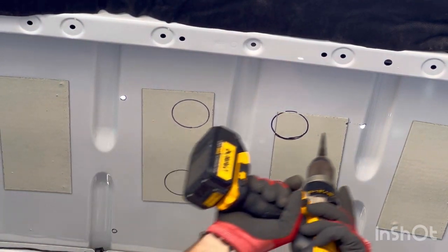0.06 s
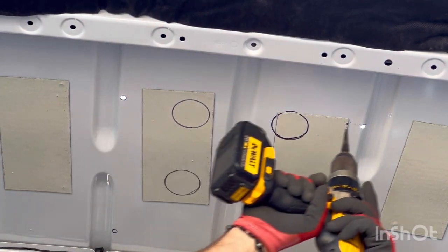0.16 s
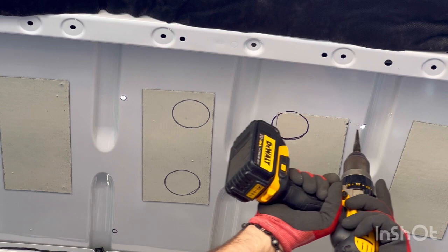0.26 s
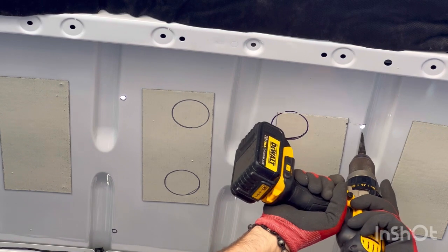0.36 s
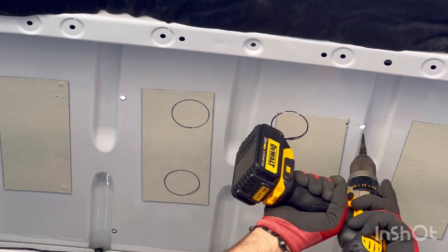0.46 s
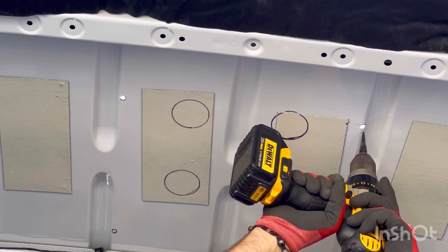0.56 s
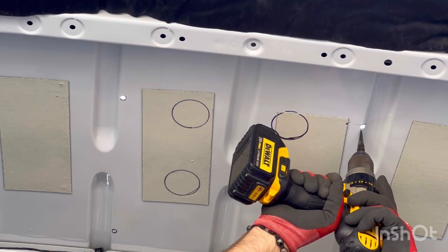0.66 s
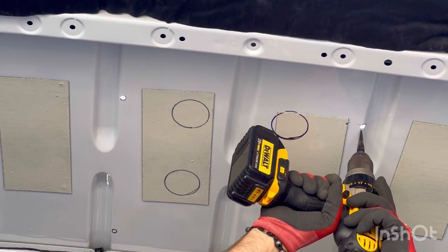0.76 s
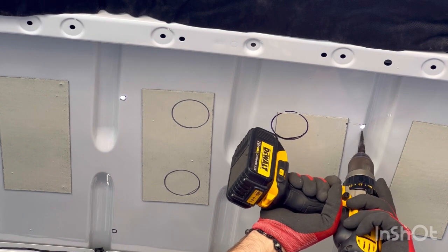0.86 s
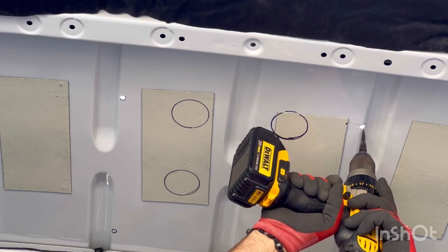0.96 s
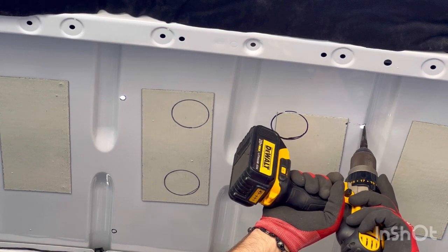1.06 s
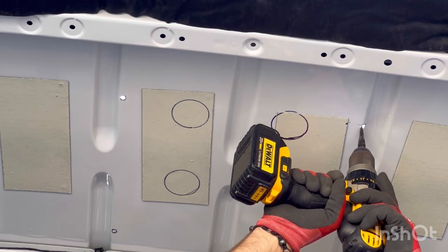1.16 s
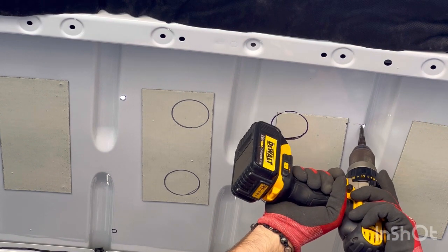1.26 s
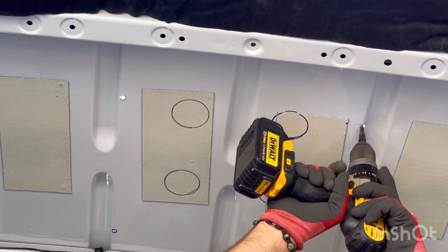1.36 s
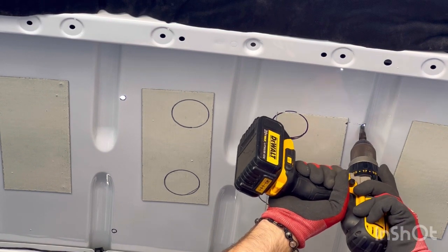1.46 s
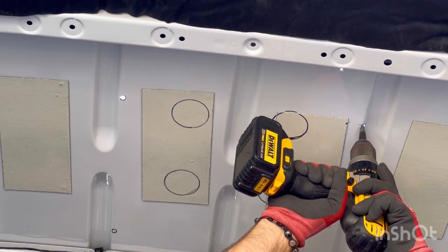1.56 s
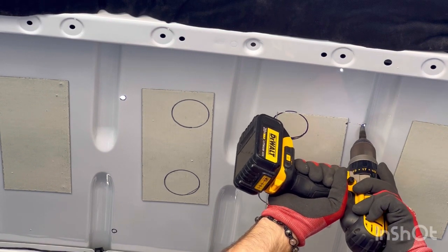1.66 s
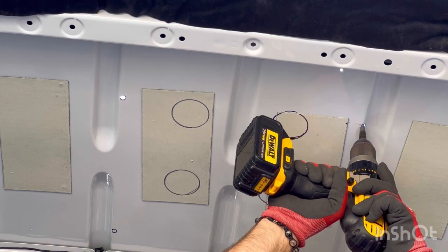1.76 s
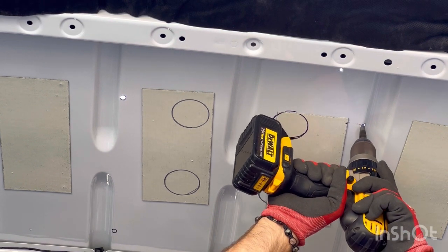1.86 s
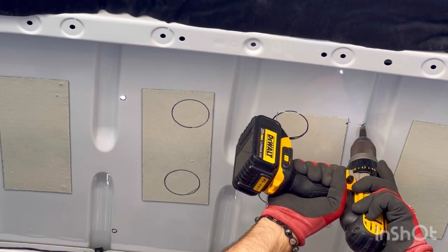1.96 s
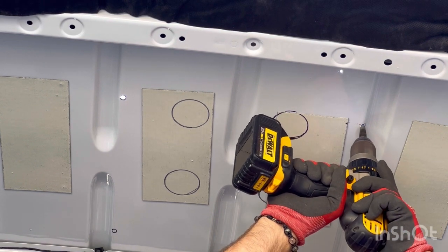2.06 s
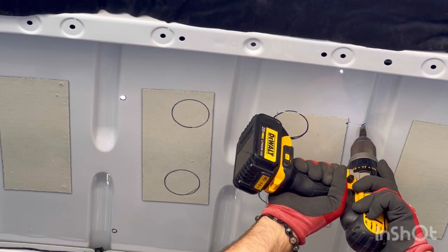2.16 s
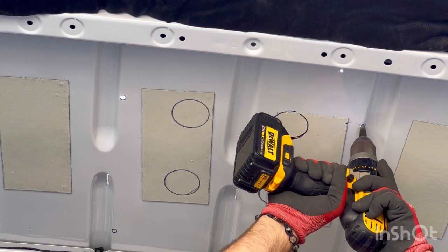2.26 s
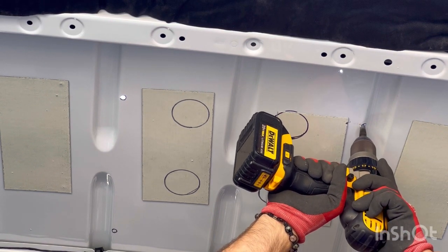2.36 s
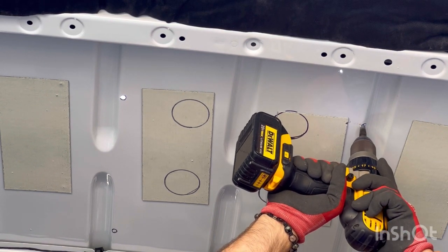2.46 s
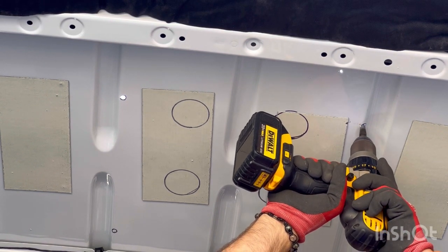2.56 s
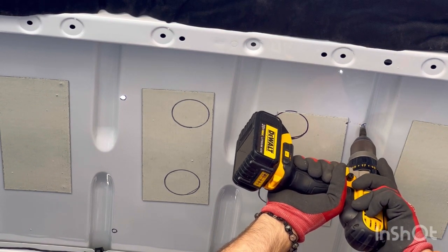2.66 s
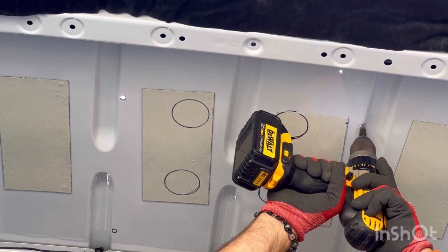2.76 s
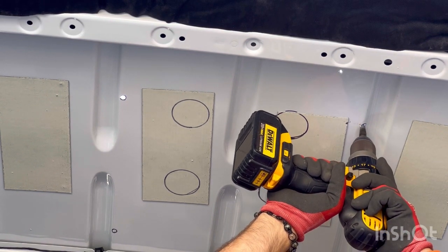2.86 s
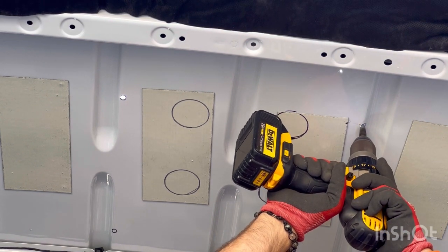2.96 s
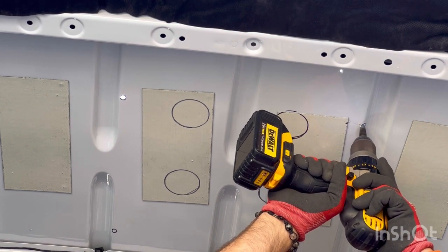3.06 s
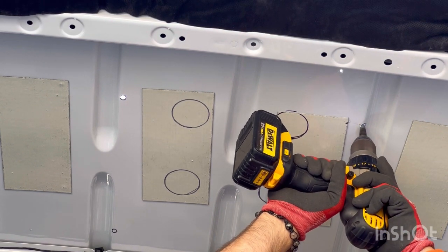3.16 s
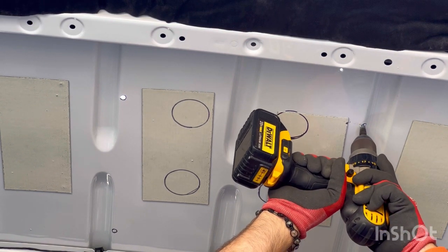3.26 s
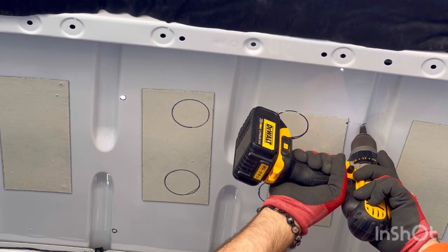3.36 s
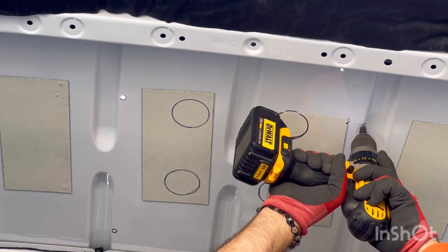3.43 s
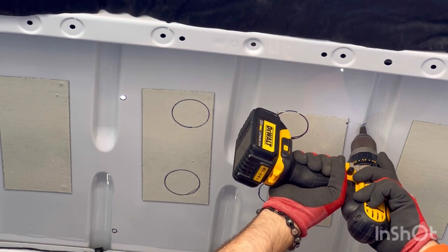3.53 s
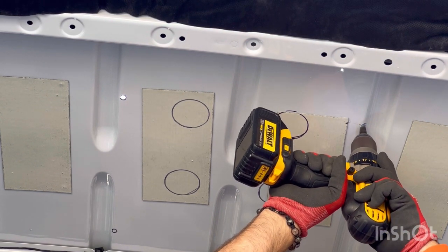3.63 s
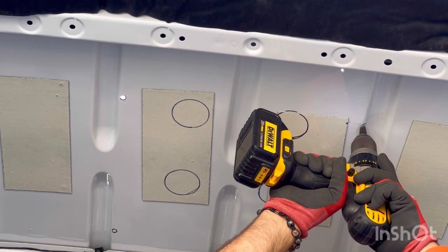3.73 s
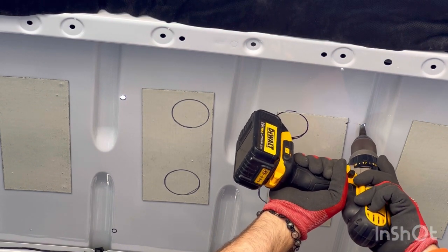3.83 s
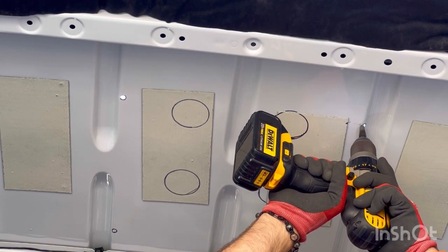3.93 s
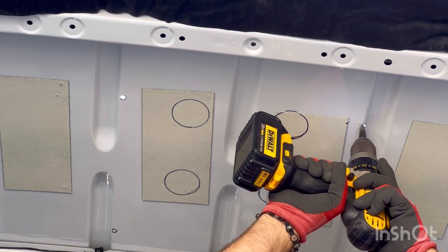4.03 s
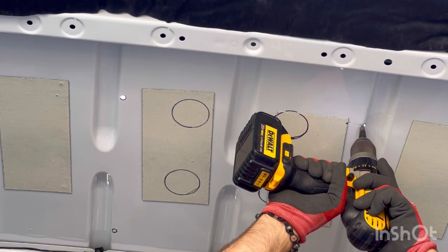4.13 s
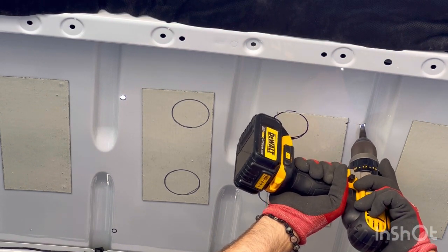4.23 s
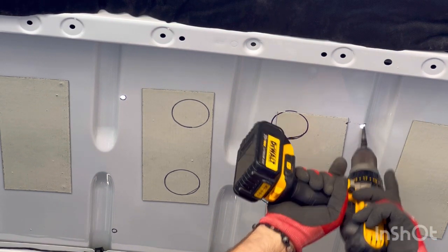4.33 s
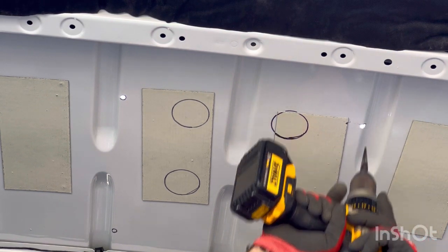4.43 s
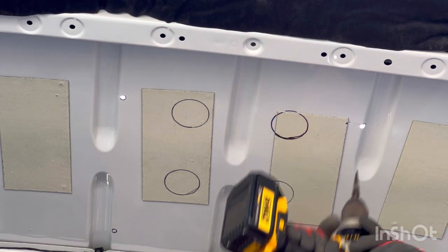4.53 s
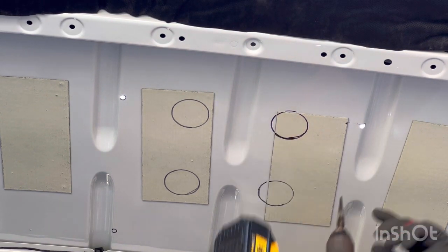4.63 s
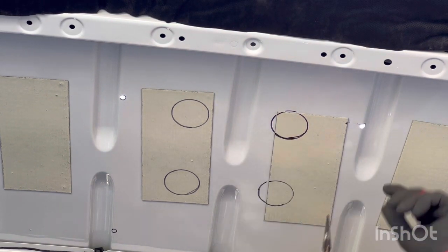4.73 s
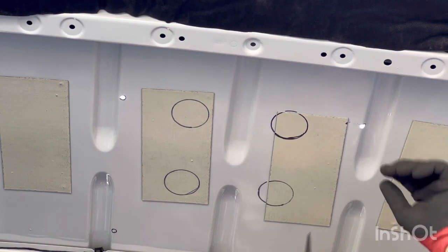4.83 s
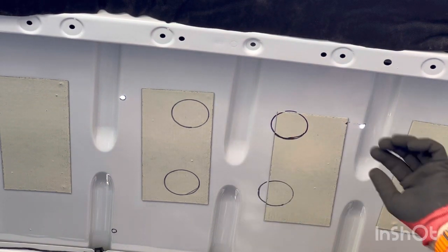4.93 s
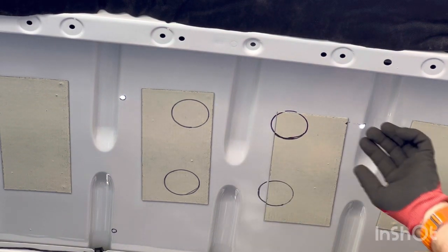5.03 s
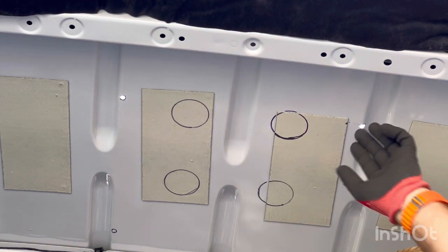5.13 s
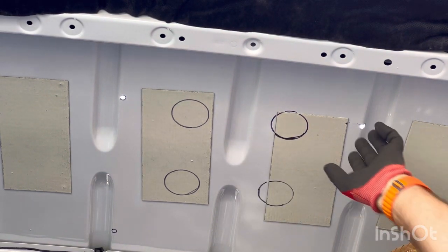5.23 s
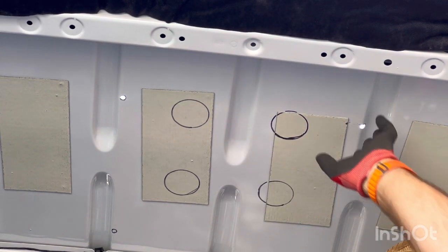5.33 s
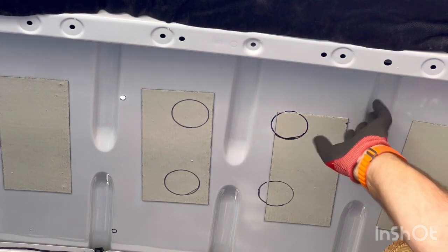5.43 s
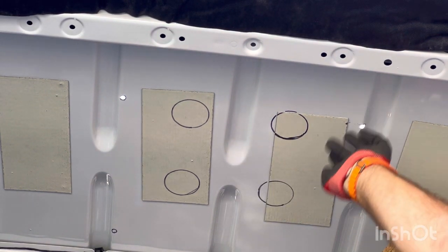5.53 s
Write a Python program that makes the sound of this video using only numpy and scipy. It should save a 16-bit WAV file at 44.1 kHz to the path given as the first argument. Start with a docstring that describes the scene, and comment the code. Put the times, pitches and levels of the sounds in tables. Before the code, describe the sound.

A close stereo perspective inside a bare van cargo space, with soft low rumble from outside throughout. A faint tool click comes at 0.15 s, then a dull, resonant knock of the bit on sheet steel at 0.65 s. From 1.15 to 1.45 s several quicker knocks boom through the panel with light skidding. A trigger click and hard chuck clack at 1.5 s start the cordless drill; its whine spins up rapidly and holds nearly steady. Gritty scraping, tiny squeaks and fluttering judder grow heaviest around 2.6-3.1 s, with sharp chip snags near 2.0, 2.3, 2.65, 3.35 and 3.5 s. From 3.8 s the cut lightens and the motor runs slightly faster. At 4.3 s it brakes abruptly with another clack. Faint rubbing, ticks and hollow housing taps follow to 5.5 s, while a dull outdoor rush swells, peaking near 5.25 s. The reverberation is short and metallic.

```python
"""Cordless drill in a van

Inside a bare cargo space, a drill bit is set on the steel wall with a few knocks and skids lightly.
The chuck clacks, motor and gear orders whine up, and the flutes drive scraping chip noise and panel modes.
Big chips rasp and jolt the sheet, the brake and a second clack end the run, and handling clicks follow.
Filtered noise rumbles outside throughout and swells to a dull rush; noise tails make the van's reverb."""
import sys
import numpy as np
from scipy import signal
from scipy.fft import rfft, irfft
from scipy.io import wavfile
from scipy.ndimage import uniform_filter1d

SR = 44100
rng = np.random.default_rng(int(sys.argv[2]) if len(sys.argv) > 2 else 0)


def wav_record(signal):
    """Record a signal, one row per channel, as 16-bit PCM in the file named by sys.argv[1]."""
    frames = np.transpose(np.atleast_2d(signal))
    bounded = np.clip(frames, -1, 1)
    # unit amplitude maps onto the largest positive 16-bit level
    quanta = np.round(bounded * 32767).astype(np.int16)
    wavfile.write(sys.argv[1], SR, quanta)


N = 246517
T = np.arange(N) / SR
HZ = np.maximum(np.arange(N + 1) * SR / (2 * N), 1)

# Powered stretch of the drilling: start and stop in seconds.
RUN_S = (1.515, 4.325)
# Bit knocking on the wall. Each row: start in seconds, thud level in dB, metallic tick level in dB.
KNOCKS = [(.659, -27, -83), (1.16, -31, -46), (1.243, -32, -77), (1.310, -31.5, -69.5), (1.363, -28.5, -64),
          (1.424, -33, -76.5)]
# Colour of a metallic tick. Each row: frequency in Hz, level in dB.
TICK = [(500, 2), (1600, -5), (2500, 1), (4000, 0), (7000, 1.5), (10000, -11), (12000, -7), (16000, -2)]
# Colour of chips scraping on the flutes. Each row: frequency in Hz, level in dB.
SCRAPE = [(150, -23.5), (500, 2.5), (900, -2.5), (1500, -0.5), (3000, -0.5), (4200, -1.5), (5000, -1.5),
          (6600, -2), (7600, -4.5), (10000, -9.5), (13000, -8.5), (16000, -11.5)]


def undb(db):
    """Decibels to gain."""
    return 10 ** (np.asarray(db) / 20)


def unit(x):
    """Scale to rms 1."""
    return x / np.sqrt(np.mean(x ** 2))


def curves(table):
    """Turn rows of (seconds, values..) into one envelope per value column."""
    s, *columns = np.transpose(table)
    return [np.interp(T, s, c) for c in columns]


def spectrum(points):
    """Levels in dB at every frequency, interpolated on a log frequency scale."""
    hz, db = np.transpose(points)
    return np.interp(np.log(HZ), np.log(hz), db)


def filtered(x, response):
    """Pass a sound through a frequency response."""
    return irfft(rfft(x, 2 * N) * response)[:N]


def causal(db):
    """Minimum-phase response with these levels: it rings only after a blow."""
    cepstrum = irfft(np.log(undb(db)))
    cepstrum[1:N] *= 2
    cepstrum[N + 1:] = 0
    return np.exp(rfft(cepstrum))


def noise():
    """White noise of rms 1."""
    return rng.standard_normal(N)


def walk(rate):
    """Smooth random drift of rms 1 that heads for a new value about rate times a second."""
    size = max(int(SR / rate), 2)
    steps = np.repeat(rng.standard_normal(N // size + 1), size)
    return unit(uniform_filter1d(steps, size)[:N])


def burst(s, t60):
    """Dense micro-impacts that start at s and die away by 60 dB in t60 seconds."""
    out = np.zeros(N)
    start = int(s * SR)
    age = T[:min(N - start, SR // 2)]
    decay = np.exp(-np.log(1000) * age / t60)
    out[start:start + len(age)] = decay * rng.standard_normal(len(age))
    return out


def scattered(start, stop, t60, spread_db, count):
    """Small contacts at random moments of a stretch of time, up to spread_db below full strength."""
    draws = rng.uniform(size=(count, 2))
    return sum(undb(-spread_db * weak) * burst(start + (stop - start) * when, t60)
               for when, weak in draws)


def tool(points):
    """Response of the drill's metal parts: a broad colour lifted at their resonances."""
    # Resonances of bit, chuck and gearbox. Each row: frequency in Hz, width in Hz, lift in dB.
    tool_modes = [(2297, 75, 7.5), (2740, 420, 3.5), (3350, 170, 1), (4510, 130, 4), (5410, 100, 6),
                  (5685, 120, 6), (6090, 150, 2), (9050, 26, 6.5), (11780, 220, 6.5)]
    lifts = sum(lift / (1 + (2 * (HZ - hz) / width) ** 2) for hz, width, lift in tool_modes)
    db = spectrum(points) + lifts
    return causal(db - 10 * np.log10(np.mean(undb(db) ** 2)))


def panel():
    """Response of the steel wall: its modes push and pull in pairs, which spreads each blow in time."""
    # Modes of the steel wall. Each row: frequency in Hz, width in Hz, level in dB.
    panel_modes = [(114, 31, -15), (172.3, 26, -1), (203, 13, 7.5), (234, 12, -5), (283, 17, 2),
                   (333, 7.6, 4), (402.4, 19, 2.5), (454.5, 29, 2), (503.6, 18, 3), (574, 50, -7.5),
                   (727, 7.7, -5.5), (785, 30, -12), (858, 7.6, -7.5), (1050, 26, -10), (1224, 75, -26)]
    modes = 0
    for k, (hz, width, db) in enumerate(panel_modes):
        sign = (-1) ** (k // 2)
        modes = modes + sign * undb(db) / (1 + 1j * (HZ / hz - hz / HZ) * hz / width)
    return modes / np.sqrt(np.mean(np.abs(modes) ** 2))


def clicks(table, points):
    """Hard contacts of (s, dB, t60 s) ring the metal parts of the drill."""
    return filtered(sum(undb(db) * burst(s, t60) for s, db, t60 in table), tool(points))


def struck(table, points, t60):
    """Contacts of (s, dB) that all ring the drill alike."""
    return clicks([(s, db, t60) for s, db in table], points)


def outside(rumble_db=-45.5, rush_db=-53, swell_db=-40.5):
    """Dull outdoor noise: a wavering rumble, and a rush that swells to a peak and falls away."""
    # Colour of the rumble. Each row: frequency in Hz, level in dB.
    rumble_colour = [(15, -41.5), (25, -3.5), (38, -6), (59, -2.5), (161, -9.5), (185, -12.5), (293, -13),
                     (427, -29), (641, -31), (962, -33.5), (1520, -43), (3820, -58), (5570, -66),
                     (16000, -64.5)]
    # Colour of the rush. Each row: frequency in Hz, level in dB.
    rush_colour = [(100, -26.5), (170, 8.5), (250, 0), (340, 5.5), (460, -1), (560, -5.5), (680, -3),
                   (820, -19.5), (1000, -18), (1250, -41.5), (1800, -52), (4000, -62)]
    peak_s, rise_s, fall_s = 5.26, .66, .244
    swell = np.exp(np.minimum((T - peak_s) / rise_s, (peak_s - T) / fall_s))
    waver = undb(.7 * walk(12))
    rumble = unit(filtered(noise(), undb(spectrum(rumble_colour)))) * undb(rumble_db) * waver
    rush = unit(filtered(noise(), undb(spectrum(rush_colour))))
    return rumble + rush * (undb(rush_db) + undb(swell_db) * swell)


def handling(fidget_db=-66.0, fidget_t60=0.074):
    """The trigger clicks, the housing is tapped, and loose parts tick faintly as the tool is put away."""
    # Trigger and clearest handling clicks. Each row: start in seconds, level in dB, ring t60 in seconds.
    handling_clicks = [(.157, -55.5, 0.084), (.568, -68, 0.068), (1.448, -60, 0.089), (1.483, -37, 0.39),
                       (4.528, -53, 0.15), (4.854, -60, 0.072), (4.952, -60, 0.07), (5.134, -67, 0.057),
                       (5.4385, -59, 0.074), (5.455, -54, 0.06)]
    # Hollow taps on the plastic housing. Each row: start in seconds, level in dB.
    taps = [(.779, -56), (4.922, -62), (5.188, -70)]
    # Colour of the housing. Each row: frequency in Hz, level in dB.
    housing = [(500, -14), (1600, -8), (2500, 5), (3500, -8), (7000, -15), (16000, -16)]
    stop = RUN_S[1]
    fidgets = scattered(stop + .3, stop + .5, fidget_t60, spread_db=5, count=8)
    loose_parts = undb(fidget_db) * filtered(fidgets, tool(TICK))
    return clicks(handling_clicks, TICK) + struck(taps, housing, t60=.08) + loose_parts


def knocks(contact_t60=0.065, tick_t60=0.057, ring_db=1.5, contact_db=-4.0, boom_db=-2.0, boom_t60=0.28):
    """The tip lands on the wall: the sheet clonks, the whole wall booms on, and the bit ticks."""
    # Colour of the tip's contact. Each row: frequency in Hz, level in dB.
    contact_colour = [(100, 6), (200, 15.5), (300, 0.5), (560, 11.5), (750, 4.5), (920, 10.5), (1280, -5.5),
                      (2000, -4.5), (2570, -7), (3200, -18), (8000, -56.5)]
    # Colour of the boom after a knock. Each row: frequency in Hz, level in dB.
    boom_colour = [(30, -21.5), (48, 8), (70, -5.5), (100, 2.5), (150, -10.5), (200, 4.5), (270, -13),
                   (600, -77)]
    thuds = sum(undb(db) * burst(s, contact_t60) for s, db, _ in KNOCKS)
    ticks = sum(undb(db) * burst(s, tick_t60) for s, _, db in KNOCKS)
    booms = sum(undb(db) * burst(s, boom_t60) for s, db, _ in KNOCKS)
    # the boom's share of each knock grows from 1.15 s to 1.36 s
    booms = booms * np.interp(T, [1.15, 1.36], [.3, 1])
    wall = undb(ring_db) * panel() + undb(contact_db) * causal(spectrum(contact_colour))
    boom = undb(boom_db) * filtered(booms, tool(boom_colour))
    return filtered(thuds, wall) + boom + filtered(ticks, tool(TICK))


def rubbing(chatter_db=-23.5, chatter_t60=0.23):
    """Light friction that catches and slips unevenly: the tip skids, later gloves shift on the grip."""
    # Colour of light rubbing. Each row: frequency in Hz, level in dB.
    rub_colour = [(400, 5), (1000, 8), (2300, 5), (4000, -1.5), (5500, -9), (6500, -21), (12000, -36),
                  (16000, -33.5)]
    skid_s, skid_db = 1.16, -70.5
    glove_db, glove_fade_db_per_s = -68, 27
    start, stop = RUN_S
    # the skid is strongest just after each knock
    chatter = sum(undb(db + chatter_db - 60 * np.abs(T - s) / chatter_t60) * (T > s)
                  for s, db, _ in KNOCKS)
    skid = (undb(skid_db) + chatter) * (T > skid_s) * (T < start)
    gloves = undb(glove_db - glove_fade_db_per_s * np.abs(T - stop)) * (T > stop)
    catches = undb(2.5 * walk(55))
    return filtered(unit(noise() * catches), tool(rub_colour)) * (skid + gloves)


def chuck():
    """Slack in chuck and spindle lock slams shut and rebounds as the motor starts and stops."""
    # Slams of the slack. Each row: start in seconds, level in dB.
    slams = [(1.4992, -13), (4.313, -13), (4.393, -42.5)]
    # One blow and two rebounds per slam. Each row: delay in seconds, level in dB.
    rebounds = [(0, 2.5), (.0038, -7), (.014, -2)]
    # Colour of a clack. Each row: frequency in Hz, level in dB.
    clack_colour = [(150, -9.5), (700, -13), (1200, 2), (1700, -3), (2600, -0.5), (4500, -3), (7000, -3),
                    (10000, -10), (16000, -8)]
    blows = [(s + delay, db + rebound_db) for s, db in slams for delay, rebound_db in rebounds]
    return struck(blows, clack_colour, t60=0.063)


def motor_speed(trigger_s=1.46, spin_up_s=.058, brake_s=.04):
    """Turns per second: exponential spin-up, sag under the cut, exponential braking."""
    # Speed held against the cut. Each row: time in seconds, motor turns per second in Hz.
    held_speed = [(1.83, 391.8), (2.0, 388.9), (2.2, 389.3), (2.4, 385.9), (2.95, 385.0), (3.1, 386.4),
                  (3.22, 384.6), (3.38, 375.5), (3.48, 382.2), (3.7, 382.5), (3.8, 388.5), (4.0, 393.7),
                  (4.23, 394.1), (4.3, 377)]
    spin_up = 1 - np.exp(-np.maximum(T - trigger_s, 0) / spin_up_s)
    brake = np.exp(-np.maximum(T - RUN_S[1], 0) / brake_s)
    return curves(held_speed)[0] * spin_up * brake


def running(fade_s):
    """1 while the spindle turns, opening over 14 ms and dying away under the brake."""
    start, stop = RUN_S
    return np.clip((T - start) / 0.014, 0, 1) * np.exp(-np.maximum(T - stop, 0) / fade_s)


def whining(turns, speed, load):
    """Magnetic and gear orders follow the motor's rotation and grow steeply with its speed."""
    # Gear tones, as multiples of the motor speed.
    gear_orders = [6, 11.6, 11.83, 12, 13.72, 14.57, 16.28]
    # Level of each gear tone in dB, relative to the common gear level.
    gear_order_db = [-7.5, -5.5, -9, 2.5, -14.5, -12, -15.5]
    whine_db, gear_tone_db, gear_load_db = -33, -33.5, -7.5
    bite_s, bite_rise_s = 1.87, .08
    # both fade slowly from the trigger pull on, by 2.53 dB per second
    fade_db = 2.53 * (T - 1.46)
    # the gears sing once the bit has bitten, most when it runs light
    bitten = .65 + .35 * np.tanh((T - bite_s) / bite_rise_s)
    gear_db = gear_tone_db + gear_load_db * load + 20 * np.log10(bitten)
    # the rotation jitters a little
    angle = 2 * np.pi * turns + .016 * walk(70)
    orders = [(18, whine_db)]  # the magnetic whine
    orders += [(k, gear_db + db) for k, db in zip(gear_orders, gear_order_db)]
    tones = sum(undb(db - fade_db + 1.6 * walk(25)) * np.sin(k * angle) for k, db in orders)
    return np.sqrt(2) * tones * (speed / speed.max()) ** 6


def steadied(x):
    """The arm's steady push evens out the force over about 0.09 s."""
    return x / np.sqrt(uniform_filter1d(x ** 2, size=4000) + 1e-9)


def flexing(flute, sway=0.51):
    """The whole wall booms under the push, and sways with the flutes."""
    # Colour of the wall flexing. Each row: frequency in Hz, level in dB.
    flex_colour = [(28, -21), (42, -4), (62, 8), (82, -8), (110, 8), (140, -10), (200, -29.5)]
    boom = unit(filtered(noise(), undb(spectrum(flex_colour))))
    return steadied(boom + sway * (np.sin(2 * np.pi * flute) + np.sin(4 * np.pi * flute)))


def snaps(flute, scatter_db):
    """One blow each time a flute lets go, its strength scattered at random."""
    at = np.flatnonzero(np.diff(np.floor(flute)) > 0)
    out = np.zeros(N)
    out[at] = undb(scatter_db * rng.uniform(-1, 1, len(at)))
    return unit(out)


def thumping(flute, load, judder=0.91, throb=1.01, throb_hz=405, throb_width_hz=130):
    """The flutes snap and judder on the sheet; under load the steel round the hole throbs at every pass."""
    shake = unit(np.exp(-(flute % 1)) * noise())
    sheet = filtered(0.51 * snaps(flute, scatter_db=-2.5) + judder * shake, panel())
    # three broad resonances in a row, so each throb swells before it dies
    local = 1 / (1 + 1j * (HZ / throb_hz - throb_hz / HZ) * throb_hz / (2 * throb_width_hz)) ** 3
    throbs = unit(filtered(snaps(flute, scatter_db=5.5), local))
    return steadied(sheet + throb * np.sqrt(load) * throbs)


def scraping(flute, mesh, load, flute_db=1.36, chip_db=1.0, thick_db=4.5, split_hz=4200):
    """Chips tear off in grains, in time with the flutes; with little load the gear teeth rattle instead."""
    passes = flute.astype(int)
    # share of the treble in the sound of a chip
    bright = 1 / (1 + (split_hz / HZ) ** 6)
    # a hard-pressed bit cuts thicker chips, which sound duller
    dull_weight = undb(thick_db * (load - .5))
    out, metal = 0, tool(SCRAPE)
    for share, weight in ((bright, 1), (1 - bright, dull_weight)):
        # every pass lifts a chip of its own size, duller or brighter
        size = rng.exponential(size=passes[-1] + 1)[passes]
        pulse = size * np.sin(np.pi * flute) ** 4 * 2 - .8
        pulse_db = np.minimum(flute_db * (.5 + load) * pulse, 6)
        rattle_db = 2.5 * (1 - load) * np.cos(2 * np.pi * mesh)
        # each grain holds its level for 16 samples
        grains = np.repeat(rng.standard_normal(N // 16 + 1), 16)[:N]
        force = noise() * undb(chip_db * grains + pulse_db + rattle_db)
        out = out + weight * filtered(unit(force), np.sqrt(share) * metal)
    return out


def small_snags(snag_db=-5.0, t60=.07):
    """Little chips catch at random all through the cut."""
    return undb(snag_db) * filtered(scattered(*RUN_S, t60, spread_db=5, count=40), tool(SCRAPE))


def squeaking(squeak_db=-6.5, low_hz=2000, high_hz=6500, squeak_t60=0.043, count=330):
    """Curls of swarf squeak briefly on the flutes, each a decaying sine at its own pitch."""
    out, age = np.zeros(N), T[:SR // 8]
    decay = np.exp(-np.log(1000) * age / squeak_t60)
    for when, pitch, size in rng.uniform(size=(count, 3)):
        start = int(np.interp(when, [0, 1], RUN_S) * SR)
        hz = low_hz * (high_hz / low_hz) ** pitch
        out[start:start + len(age)] += 2 * size * decay * np.sin(2 * np.pi * hz * age)
    return undb(squeak_db) * out


def drill(flex_db=0.5, thump_db=0.0, scrape_db=-0.09):
    """One shaft drives the whine, the gears and the flutes of the bit."""
    # The cut. Each row: time in seconds, thumping of the sheet in dB, scraping of the edges in dB.
    cut = [(1.55, -36.5, -30), (1.62, -44.5, -27.5), (1.71, -30.5, -26.5), (1.76, -39.5, -27),
           (1.9, -24.5, -25.5), (2.1, -33.5, -25.5), (2.16, -26.5, -24), (2.25, -33, -27),
           (2.32, -26.5, -25), (2.55, -27, -23.5), (2.64, -18.5, -22), (2.84, -19.5, -21),
           (2.97, -25.5, -24.5), (3.07, -23, -20.5), (3.23, -24.5, -24.5), (3.72, -24.5, -23),
           (3.78, -37.5, -28), (4.3, -34.5, -28.5)]
    # Flexing of the whole wall under the push. Each row: time in seconds, level in dB.
    push = [(1.55, -37), (1.67, -55.5), (1.76, -38.5), (2.31, -30.5), (2.61, -42.5), (3.0, -32.5),
            (3.2, -45), (3.36, -32), (4.09, -47), (4.3, -37.5)]
    flutes_per_turn, mesh_per_turn = .149, 1.716  # flute passes and tooth meshes per motor turn
    speed = motor_speed()
    turns = np.cumsum(speed) / SR
    flute, mesh = turns * flutes_per_turn, turns * mesh_per_turn
    sheet_db, edge_db = curves(cut)
    load = undb(sheet_db - sheet_db.max())  # 1 at the heaviest thumping
    wall = undb(curves(push)[0] + flex_db) * flexing(flute)
    thumps = undb(sheet_db + thump_db) * thumping(flute, load)
    chips = scraping(flute, mesh, load) + small_snags() + np.sqrt(load) * squeaking()
    edges = undb(edge_db + scrape_db) * chips
    return (wall + thumps + edges + whining(turns, speed, load)) * running(fade_s=.015)


def snags(scrape_t60=0.093, thump_t60=0.066):
    """A big chip snags and tears free: it rasps on the flute and jolts the sheet."""
    # The biggest chips. Each row: start in seconds, scrape level in dB, thump of the sheet in dB.
    big_chips = [(1.721, -21.5, -33), (2.014, -21.5, -22), (2.151, -28, -32.5), (2.305, -18, -27),
                 (2.342, -20.5, -28), (2.65, -16.5, -24.5), (3.35, -17.5, -25.5), (3.524, -18, -22.5),
                 (3.803, -25.5, -24.5), (4.183, -31, -19)]
    rasps = struck([row[:2] for row in big_chips], SCRAPE, scrape_t60)
    jolts = sum(undb(db) * burst(s, thump_t60) for s, _, db in big_chips)
    return rasps + filtered(jolts, panel())


def van(x, t60=0.17, wet_db=-8.5, side_t60=0.17):
    """The bare cargo space adds a short tail, and its reflections arrive from the sides."""
    # Sideways share of the field inside the van. Each row: frequency in Hz, level in dB.
    side_share = [(30, -40), (125, -12.5), (260, -12), (550, -6.5), (1000, -5), (2200, -17.5), (4000, -5),
                  (8000, -57.5), (16000, -24.5)]
    tail = burst(.006, t60)
    # the tail is thinned below 600 Hz
    tail_response = rfft(tail, 2 * N) / np.linalg.norm(tail) * HZ / (HZ + 600)
    mid = x + undb(wet_db) * filtered(x, tail_response)
    walls = burst(.002, side_t60)
    side_response = rfft(walls, 2 * N) / np.linalg.norm(walls) * undb(spectrum(side_share))
    side = filtered(mid, side_response)
    return np.array([mid + side, mid - side])


def scene():
    """Everything is heard inside the van."""
    return van(outside() + handling() + knocks() + rubbing() + chuck() + drill() + snags())


def record(dry, top_hz=15800):
    """The left channel's phase lags above 8.7 kHz; deep bass and top treble are cut off steeply."""
    lag = np.interp(HZ, [8700, 10130, 11950, 13830, 15700], np.pi * np.arange(5))  # radians
    stereo = np.array([filtered(dry[0], np.exp(-1j * lag)), dry[1]])
    bass_cut = signal.butter(6, 36, "high", fs=SR, output="sos")
    treble_cut = signal.ellip(10, .2, 80, top_hz, fs=SR, output="sos")
    return signal.sosfilt(treble_cut, signal.sosfilt(bass_cut, stereo))


dry = scene()
out = record(dry)
wav_record(out)
```